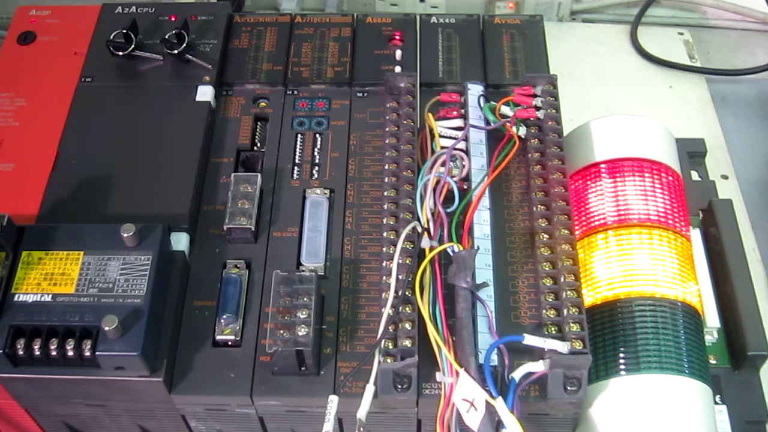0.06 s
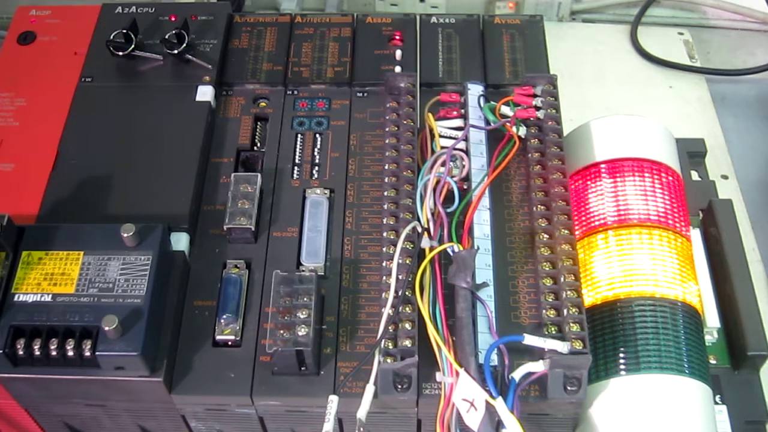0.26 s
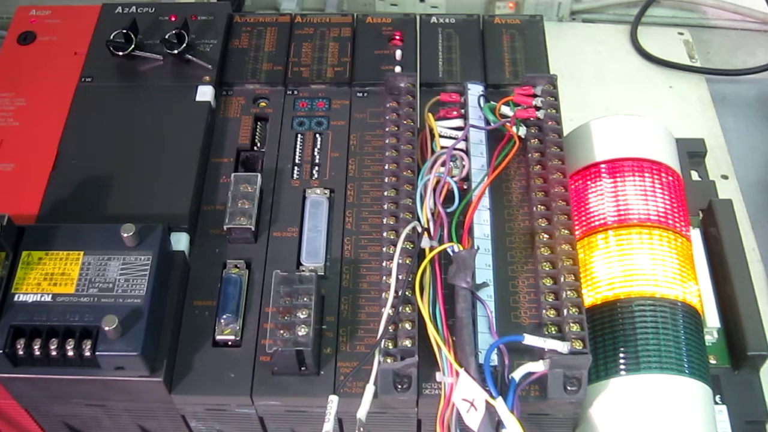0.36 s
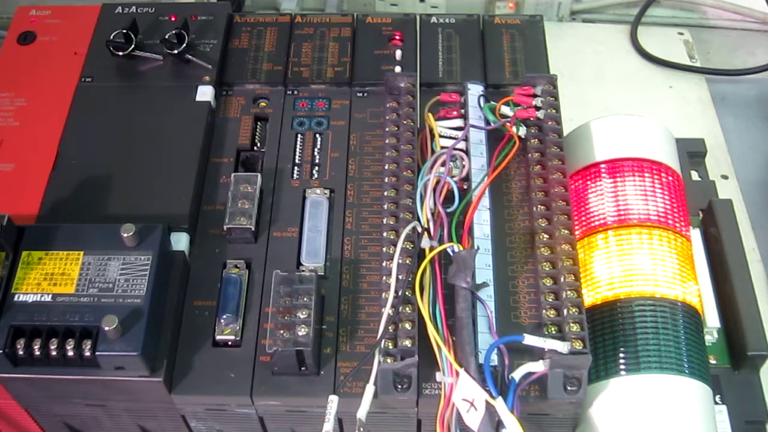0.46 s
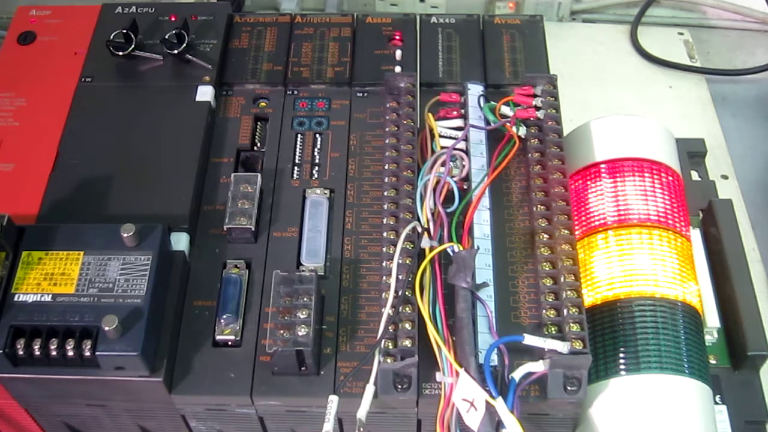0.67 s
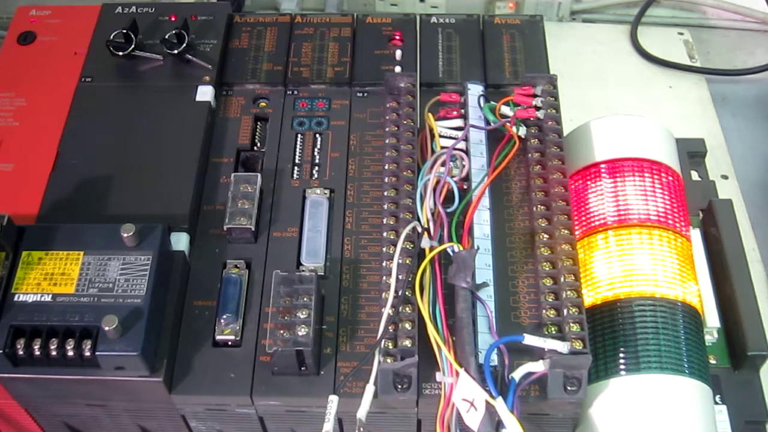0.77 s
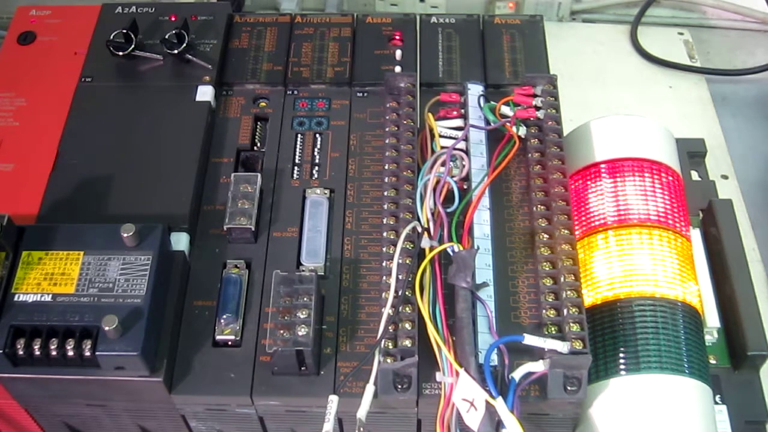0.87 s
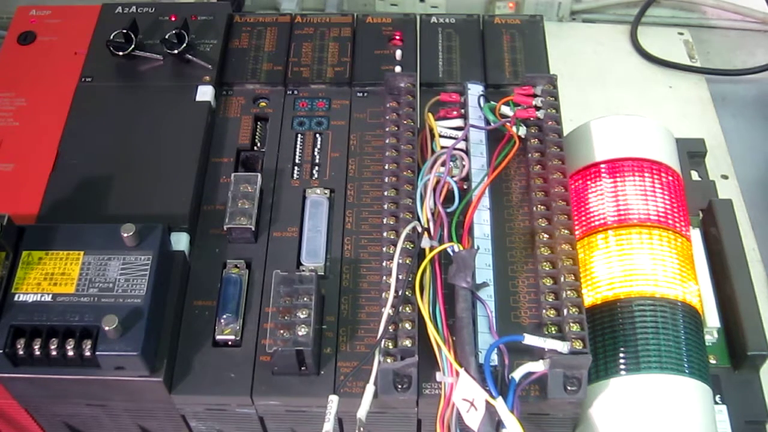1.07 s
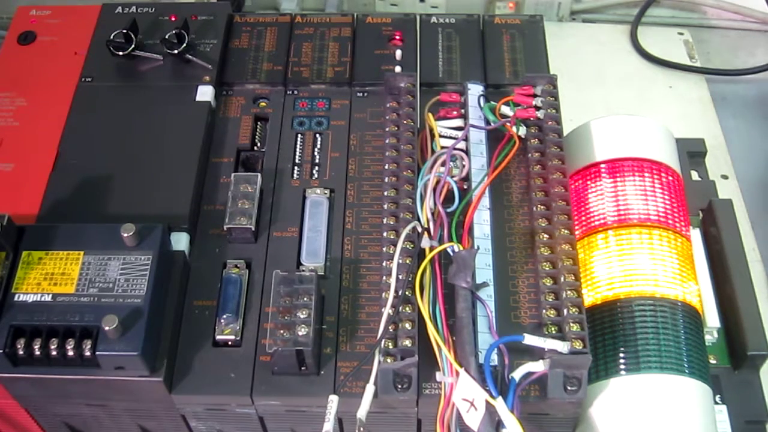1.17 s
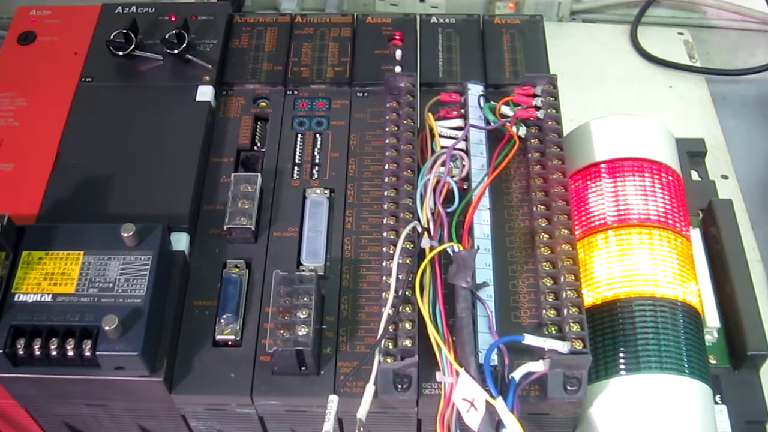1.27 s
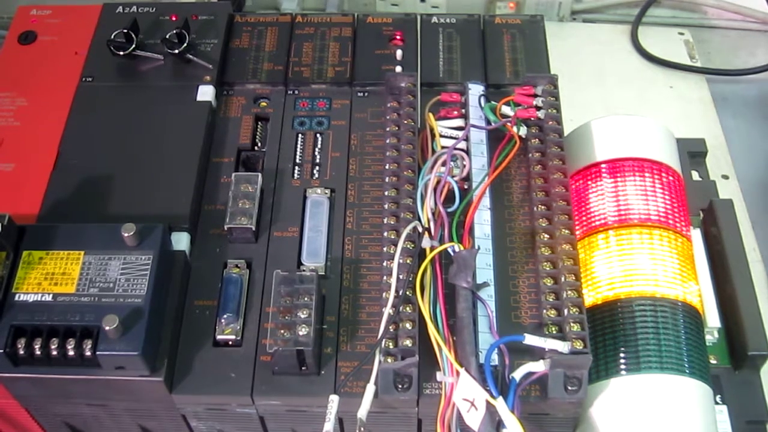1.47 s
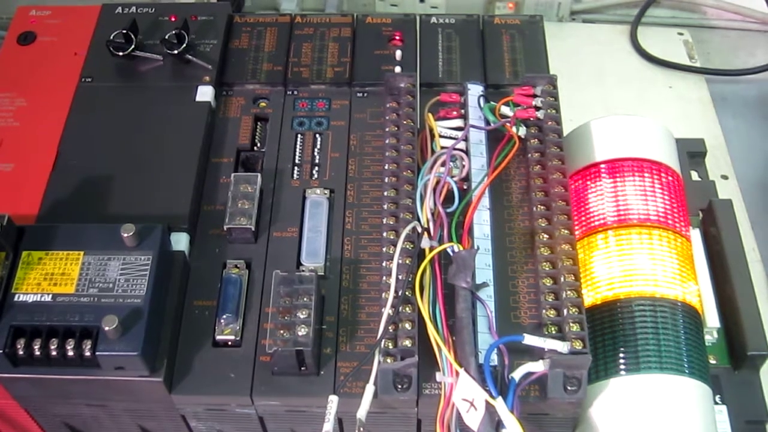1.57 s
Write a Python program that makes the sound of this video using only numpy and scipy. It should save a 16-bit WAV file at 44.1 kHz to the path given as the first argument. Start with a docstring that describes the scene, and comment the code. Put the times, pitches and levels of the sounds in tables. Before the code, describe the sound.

One crisp relay click comes from a nearby control panel in a workshop. Ventilation hums and a faint high whine pulses throughout; two hollow thuds and light scuffs come first, then the click, between two tiny ticks.

```python
"""First you hear ventilation humming in a workshop, with the thin pulsing whine of a control panel.
Two dull thuds, like footfalls on a hollow floor, set the room ringing, with faint bumps and scuffs.
Then, between two tiny ticks, a relay (an electric switch) snaps once, close by on the right:
its moving arm lands, rings its housing and shakes the panel."""
import sys
import numpy as np
from scipy import signal
from scipy.fft import rfft, irfft
from scipy.io import wavfile

SR = 44100
rng = np.random.default_rng(int(sys.argv[2]) if len(sys.argv) > 2 else 0)


def unload_wav(signal):
    """Save mono or channel-first audio to the path in sys.argv[1] as 16-bit WAV at rate SR, clipped to [-1, 1]."""
    wavfile.write(
        sys.argv[1],
        SR,
        np.round(np.clip(np.atleast_2d(signal).T, -1, 1) * 32767).astype(np.int16),
    )


N = 70560
T = np.arange(N) / SR


def from_db(db):
    """Turn decibels into a number to multiply by."""
    return 10 ** (np.asarray(db) / 20)

def rms_one(x):
    """Scale a sound so that its average strength (rms) is 1."""
    return x / np.sqrt(np.mean(x ** 2) + 1e-20)

def at_hz(points, hz):
    """Read between the rows of a table, on a scale of octaves."""
    freqs, values = np.transpose(points)
    return np.interp(np.log(hz), np.log(freqs), values)

def pan(db):
    """Left and right gains: positive dB leans left, negative leans right."""
    return from_db(np.array([[db], [-db]]) / 2)

def clicks(rows):
    """One-sample blows from rows of time in seconds and level in dB."""
    out = np.zeros(N)
    for start, db in rows:
        out[int(start * SR)] += from_db(db)
    return out

def resonate(x, hz, width_hz):
    """Pass a sound twice through a resonance; a narrower one rings longer."""
    radius = np.exp(-np.pi * width_hz / SR)
    gain = (1 - radius ** 2) / 2
    section = [gain, 0, -gain, 1, -2 * radius * np.cos(2 * np.pi * hz / SR), radius ** 2]
    return signal.sosfilt([section] * 2, x + 1e-18)

def cut(x, hz, kind):
    """A gentle filter: "low", "high" or "band" is the part kept; "bandstop" removes a band."""
    return signal.sosfilt(signal.butter(2, hz, kind, fs=SR, output="sos"), x + 1e-18)

def lows_of(x, hz, order):
    """Keep what lies below hz without delaying it."""
    return signal.sosfiltfilt(signal.butter(order, hz, fs=SR, output="sos"), x)

def wobble(hz):
    """A random wiggle of strength 1, mostly slower than hz."""
    return rms_one(cut(rng.standard_normal(N), hz, "low"))

def stereo(pair, alike):
    """Mix two noises into left and right: alike is 0 for unrelated sides, 1 for identical."""
    return np.sqrt(1 + alike) * pair[0] + np.sqrt(1 - alike) * pair[1] * [[1], [-1]]

def left_late(x, lag_s):
    """Delay the left side."""
    hz = np.arange(N + 1) * SR / (2 * N)
    delayed = rfft(x[0], 2 * N) * np.exp(-2j * np.pi * hz * lag_s)
    return np.array([irfft(delayed)[:N], x[1]])

def dying(start, fade_s, rise_s):
    """Rise quickly, then die away. A fade time is how long a drop of 60 dB takes."""
    age = np.maximum(T - start, 0)
    return (1 - np.exp(-age / rise_s)) * np.exp(-np.log(1000) * age / fade_s)

def hump(peak_s, half_s):
    """Swell and fade smoothly around one moment."""
    return np.exp(-((T - peak_s) / half_s) ** 2)

def ringing(start, notes, build_cycles=2.36):
    """A struck object's own notes take a few cycles to build up, then die away."""
    return sum(from_db(db) * dying(start, fade_s, build_cycles / hz)
               * np.sin(2 * np.pi * hz * (T - start)) for hz, db, fade_s in notes)

# How alike the room sounds on both sides. Each row: frequency in Hz, likeness from 0 to 1.
ROOM_LIKENESS = [(30, 0.83), (130, 0.81), (400, 0.55), (1000, 0.91), (2200, 0.074), (4000, 0.34),
                 (14000, 0.091)]

def noise(colour, flicker_db=0, likeness=ROOM_LIKENESS):
    """Stereo noise of strength 1, built from third-octave bands that can each flicker."""
    edges = 20 * 2 ** (np.arange(30) / 3)
    white = rng.standard_normal((2, 2, N + SR // 4))
    out = 0
    for k, band in enumerate(zip(edges, edges[1:])):
        hz = np.sqrt(band[0] * band[1])
        flicker = np.interp(T, np.linspace(0, T[-1], 40), rng.standard_normal(40))
        gain = from_db(at_hz(colour, hz) + flicker_db * flicker)
        pair = cut(white[k % 2], band, "band")[:, -N:]
        out = out + gain * stereo(pair, at_hz(likeness, hz))
    return rms_one(out)


# The ventilation's hum. Each row: pitch in Hz, level in dB.
HUM_TONES = [(204.6, -68.5), (280, -68.5), (549, -69)]
# The rush of air. Each row: frequency in Hz, relative level in dB.
AIR_COLOUR = [(20, -1.5), (60, 1), (95, 0), (150, 3), (280, 0), (450, -3.5), (700, -5.5), (1200, -9.5),
              (2200, -13), (4000, -14), (7000, -19), (9500, -27), (11500, -30.5), (14500, -30)]
# How the lower part of the rush drifts. Each row: time in seconds, level change in dB.
AIR_DRIFT = [(0, 1.5), (0.6, 1), (0.95, 1.5), (1.28, -1), (1.57, 1)]

def ventilation():
    """Moving air rushes over a faint hum; its lower part eases off briefly."""
    hum = sum(from_db(db) * np.sqrt(2) * np.sin(2 * np.pi * (hz * T + rng.random()))
              for hz, db in HUM_TONES)
    air = from_db(-50) * noise(AIR_COLOUR, flicker_db=0.6)
    lows = lows_of(air, hz=2000, order=2)
    drift = from_db(np.interp(T, *np.transpose(AIR_DRIFT)))
    return hum + (air - lows) + lows * drift


def pulsing(x, peak_s, swing_db, per_second=14.85):
    """Make a sound swell over and over, no two swells quite alike; strength 1."""
    uneven_db = 0.8 * wobble(per_second)
    pulse_db = swing_db * np.cos(2 * np.pi * per_second * (T - peak_s))
    return rms_one(x * from_db(uneven_db + pulse_db))

# The whine. Each row: pitch in Hz, level in dB, time of one swell in seconds, swing in dB.
WHINE_TONES = [(5697, -61.5, .053, 6.5), (4940, -67.5, .065, 7.5), (5184, -70, .056, 1),
               (6062, -71.5, .053, 4)]
# The hiss around it. Each row: centre in Hz, width in Hz, level in dB, swing in dB.
WHINE_HISS = [(5820, 330, -65, 4), (5450, 950, -57.5, .7)]

def whine():
    """The electronics give high, wavering tones in a narrow hiss, all pulsing at one rate."""
    out = 0
    for hz, db, peak_s, swing_db in WHINE_TONES:
        pitch_hz = hz + 20 * wobble(hz=60)
        tone = np.sin(2 * np.pi * np.cumsum(pitch_hz) / SR)
        out = out + from_db(db) * pulsing(tone, peak_s, swing_db)
    for hz, width_hz, db, swing_db in WHINE_HISS:
        hiss = stereo(resonate(rng.standard_normal((2, N)), hz, width_hz), alike=0.054)
        out = out + from_db(db) * pulsing(hiss, peak_s=0.053, swing_db=swing_db)
    return out


# The two blows. Each row: start in seconds, level in dB, frequency in Hz above which it is dulled.
THUD_BLOWS = [(0.2235, -3.5, 1390), (0.6827, -8, 790)]
# The paths a thud arrives by. Each row: seconds after the main arrival, level in dB.
THUD_ARRIVALS = [(-0.0049, -14), (0, 0), (0.0086, -7), (0.0132, -8), (0.0229, -8), (0.0261, -11),
                 (0.0294, -6), (0.0342, -8), (0.0455, -16), (0.0605, -13), (0.0652, -14), (0.0815, -15),
                 (0.0908, -18)]
# The notes of the floor and room. Each row: pitch in Hz, level in dB, fade time in seconds.
FLOOR_NOTES = [(66.8, -36, 0.8), (129.5, -36, 0.36), (288.8, -37, 0.59), (428, -46.5, 0.34),
               (462, -45, 0.33), (549.6, -45.5, 3.4), (616, -27.5, 0.15), (716, -43, 0.87),
               (892, -33, 0.25), (1207, -43.5, 0.31), (1517, -38, 0.16), (2050, -34.5, 0.12)]
# The wash of echoes after a thud. Each row: frequency in Hz, relative level in dB.
WASH_COLOUR = [(60, -3.5), (200, -8), (350, -1), (600, 4.5), (900, -9), (1500, -10.5), (2200, -10),
               (4000, -16), (14000, -26)]
# How alike that wash is on both sides. Each row: frequency in Hz, likeness from 0 to 1.
WASH_LIKENESS = [(60, 0.94), (600, 1), (2000, 1)]
# The gritty graze on contact. Each row: frequency in Hz, relative level in dB.
GRAZE_COLOUR = [(300, -24), (1600, 8.5), (3000, 2.5), (4500, -2), (8000, -6.5), (14000, -17)]

def thuds():
    """Each soft blow grazes the floor, knocks hollowly and leaves the floor and room ringing."""
    wash = noise(WASH_COLOUR, likeness=WASH_LIKENESS)
    grit = noise(GRAZE_COLOUR)
    graze_lead_s = 0.0068
    out = 0
    for start, db, dull_hz in THUD_BLOWS:
        arrivals = clicks([(start + delay, path_db) for delay, path_db in THUD_ARRIVALS])
        knock = from_db(23) * cut(resonate(arrivals, hz=509, width_hz=231), 224, "high")
        room = from_db(-30.5) * wash * dying(start, fade_s=0.56, rise_s=0.0015)
        graze = from_db(-45.5) * grit * dying(start - graze_lead_s, fade_s=0.26, rise_s=0.0015)
        body = cut(room - knock - ringing(start, FLOOR_NOTES), dull_hz, "low")
        out = out + from_db(db) * (graze + body)
    return out


# Three bumps and a ring. Each row: start in seconds, strength in dB, pitch in Hz, width in Hz.
BUMPS_AND_RING = [(0.335, 5.5, 257, 110), (0.821, -3.5, 262, 242), (0.831, 4.5, 565, 59.5),
                  (0.875, 3, 95, 60)]

def bumps_and_ring():
    """Faint low bumps, and a brief hollow ring after the second thud."""
    return sum(resonate(clicks([(start, db)]), hz, width_hz)
               for start, db, hz, width_hz in BUMPS_AND_RING)


# The scuffs. Each row: peak time and half length in seconds, level in dB, pan in dB.
SCUFF_RUBS = [(0.42, 0.018, -55.5, -1), (0.842, 0.021, -54.5, 0), (1.553, 0.028, -50, -8)]
# The sound of rubbing. Each row: frequency in Hz, relative level in dB.
RUB_COLOUR = [(100, 6.5), (300, -8), (700, -5), (2000, 3), (4000, -12.5), (8000, -15), (15000, -56)]

def scuffs():
    """Short, soft rubs make a noise that swells and fades."""
    level = sum(from_db(db) * pan(pan_db) * hump(peak_s, half_s)
                for peak_s, half_s, db, pan_db in SCUFF_RUBS)
    return level * noise(RUB_COLOUR, flicker_db=2.5)


# The ticks. Each row: peak time and half length in seconds, centre and width in Hz, level in dB.
TINY_TICKS = [(1.348, 0.0045, 7950, 400, -57), (1.547, 0.0019, 2760, 2200, -45)]

def ticks():
    """Tiny bursts of bright noise tick on the right."""
    out = 0
    for peak_s, half_s, hz, width_hz, db in TINY_TICKS:
        hiss = rms_one(resonate(rng.standard_normal((2, N)), hz, width_hz))
        out = out + from_db(db) * hump(peak_s, half_s) * hiss
    return pan(-11.5) * out


# The relay's arm lands and chatters. Each row: start in seconds, level in dB.
ARM_HITS = [(1.4346, -12), (1.4356, 0), (1.4371, -12)]
# The notes of its housing. Each row: pitch in Hz, width in Hz, level in dB, pan in dB.
HOUSING_NOTES = [(760, 300, -3.5, -3), (1371, 380, 7.5, -11.5), (2090, 470, 6.5, 10), (2740, 110, 6, -7),
                 (3280, 780, 11.5, -12.5), (4400, 1600, 4, -5), (5350, 440, 8, -7.5),
                 (6200, 1470, -1.5, 12.5), (7940, 680, 4.5, -8.5), (9500, 1200, -2.5, -11),
                 (11900, 2800, -8, -10), (15100, 1200, -14, 0)]
# The snap as the panel and room scatter it. Each row: frequency in Hz, relative level in dB.
SCATTER_COLOUR = [(60, 0), (400, -21.5), (800, -1.5), (1400, -2.5), (2100, 3.5), (3000, -0.5), (5500, 1.5),
                  (9000, -4.5), (13000, -27), (15000, -3)]
# The crack, two bursts of echoes off the panel, then the room.
# Each row: delay in seconds, level in dB, fade time in seconds, treble limit in Hz, pan in dB.
SCATTER_BURSTS = [(0.0005, -19, 0.011, 6050, -13.5), (0.0055, -38, 0.043, 8500, -8),
                  (0.01, -45.5, 0.06, 16000, -13), (0.019, -55.5, 0.67, 15000, -10.5)]
# The low ring of the panel. Each row: pitch in Hz, level in dB, fade time in seconds.
PANEL_NOTES = [(55, -60, .15), (129, -37.5, 0.11), (230, -51, 0.15)]

def relay():
    """The arm's hits ring the housing and shake the panel; the surroundings scatter the snap."""
    housing = 0
    for hz, width_hz, db, pan_db in HOUSING_NOTES:
        hits = clicks([(start, hit_db + rng.normal(0, 0.43)) for start, hit_db in ARM_HITS])
        note = from_db(db) * pan(pan_db) * resonate(hits, hz, width_hz)
        housing = note - housing  # neighbouring notes get opposite signs
    delayed = np.roll(housing, int(0.0057 * SR), axis=1)  # one echo off the cabinet
    snap = housing + from_db(-7.5) * cut(delayed, 1590, "low")
    # The lows reach both sides together; the treble reaches the left late, off the panel.
    lows = lows_of(snap, hz=1300, order=4)
    treble = left_late(snap - lows, lag_s=0.0007)
    landing = max(ARM_HITS, key=lambda row: row[1])[0]  # time of the hardest hit
    scatter = noise(SCATTER_COLOUR)
    spread = 0
    for delay, db, fade_s, top_hz, pan_db in SCATTER_BURSTS:
        level = from_db(db) * pan(pan_db) * dying(landing + delay, fade_s, rise_s=0.00015)
        spread = spread + level * cut(scatter, top_hz, "low")
    return lows + treble + spread + ringing(landing, PANEL_NOTES)


def scene():
    """Add up the sounds; the ventilation, thuds, bumps and scuffs sound slightly later on the left."""
    workshop = ventilation() + thuds() + bumps_and_ring() + scuffs()
    return left_late(workshop, lag_s=0.000136) + whine() + ticks() + relay()

def record(dry):
    """Filter out a narrow band of high treble and the very top; stop the sound just before the end."""
    end_s, fade_s, top_hz = 1.567, 0.005, 17200
    notched = cut(dry, hz=(10500, 12300), kind="bandstop")
    fade_out = np.clip((end_s - T) / fade_s + 1, 0, 1)
    return signal.sosfilt(signal.cheby2(12, 70, top_hz, fs=SR, output="sos"), notched * fade_out)


dry = scene()
out = record(dry)
unload_wav(out)
```